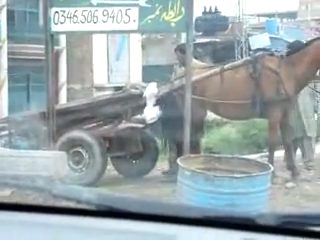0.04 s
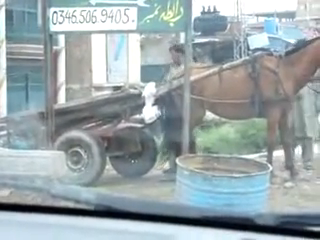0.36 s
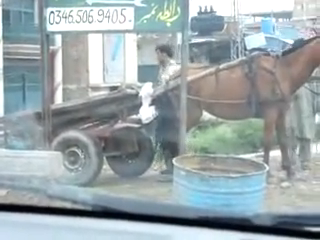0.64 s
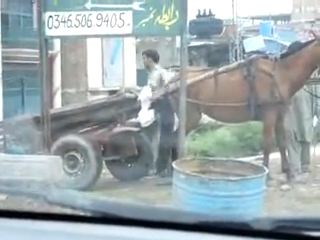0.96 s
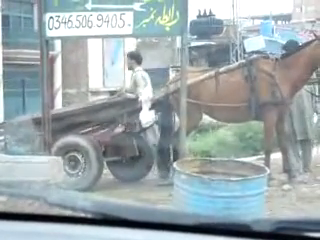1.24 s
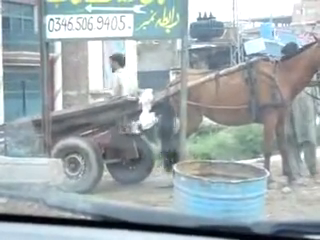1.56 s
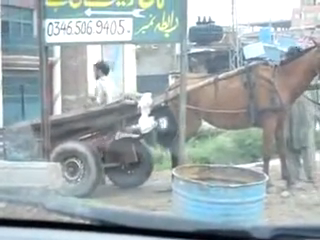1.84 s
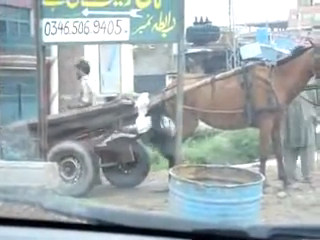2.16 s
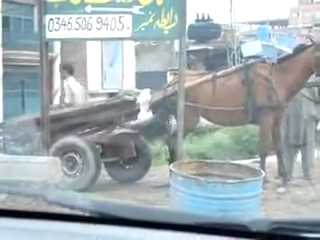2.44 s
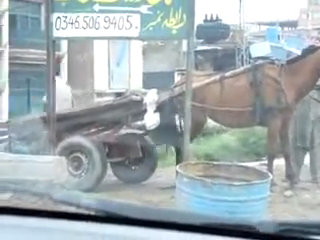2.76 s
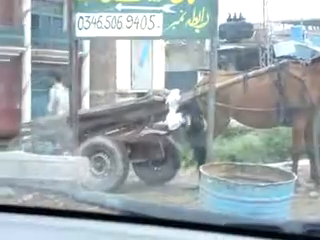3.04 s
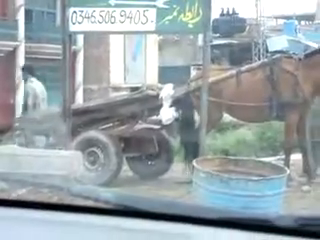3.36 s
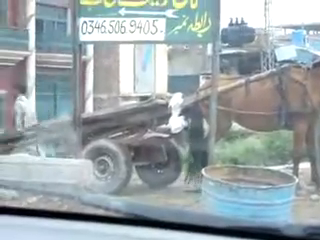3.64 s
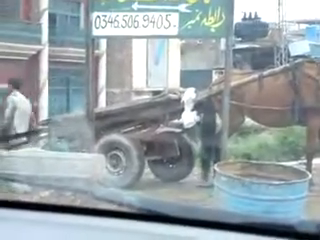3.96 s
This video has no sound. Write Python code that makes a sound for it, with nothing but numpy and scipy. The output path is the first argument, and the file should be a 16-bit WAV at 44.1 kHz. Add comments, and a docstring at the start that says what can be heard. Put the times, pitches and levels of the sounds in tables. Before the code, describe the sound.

A car engine idles with a deep, uneven throb, heard behind the windscreen with the windows shut. Tyres rumble and thud softly over three bumps, then ease off as a second low hum swells and a faint whine grows.

```python
"""Inside a small car creeping along a roadside, microphone behind the windscreen, windows shut.
From the start each firing of the idling engine presses on the cabin air as a deep, uneven throb, while
the tyres rumble through the body and thud over three bumps. Halfway the rumble eases off; then a second
hum swells and beats against the idle, and a faint whine grows. All along, the throb just overloads the
recorder, whose hiss flutters with every swing of it."""
import sys
import numpy as np
from scipy import signal
from scipy.fft import irfft
from scipy.io import wavfile
from scipy.ndimage import map_coordinates

SR = 44100
rng = np.random.default_rng(int(sys.argv[2]) if len(sys.argv) > 2 else 0)


def wav_out(sig):
    """Save sig, one row per channel (or a flat mono array), as 16-bit PCM at SR to the path in sys.argv[1]."""
    wavfile.write(sys.argv[1], SR, np.round(np.clip(np.atleast_2d(sig).T, -1, 1) * 32767).astype(np.int16))


N = 176400


def undb(db):
    """Decibels to gain."""
    return 10 ** (np.asarray(db) / 20)


def curve(rows):
    """Straight lines through (time_s, value) rows."""
    return np.interp(np.arange(N) / SR, *np.array(rows).T)


def walk(per_s):
    """A smooth random drift of spread 1, changing about per_s times a second."""
    steps = rng.standard_normal(2000)
    drift = map_coordinates(steps, [np.arange(N) / SR * per_s + 4], order=3, mode="wrap")
    return drift / drift.std()


def noise(gain):
    """Noise of rms 1 whose spectrum has the shape gain(hz)."""
    hz = np.maximum(np.arange(N // 2 + 1) * SR / N, 1)
    wave = irfft(gain(hz) * np.exp(2j * np.pi * rng.random(len(hz))), N)
    return wave / wave.std()


def coloured(points):
    """Noise of rms 1 shaped by (frequency_hz, relative_db) points, falling away below the first."""
    points_hz, db = np.array(points).T

    def gain(hz):
        low_cut = np.minimum(hz / points_hz[0], 1) ** 2
        return undb(np.interp(np.log(hz), np.log(points_hz), db)) * low_cut
    return noise(gain)


def wavering(hz, spread_hz, per_s):
    """A tone of rms 1 whose pitch wanders."""
    cycles = np.cumsum(hz + spread_hz * walk(per_s)) / SR
    return np.sqrt(2) * np.sin(2 * np.pi * (cycles + rng.random()))


def ringing(centre_hz, width_hz):
    """A steep resonance shaken at random, rms 1."""
    return noise(lambda hz: 1 / (1 + ((hz / centre_hz - centre_hz / hz) * centre_hz / width_hz) ** 2))


def engine():
    """Cabin pressure drops at each firing, strong and weak by turns; the block rocks once a crank turn."""
    # engine speed: time_s, firing_hz
    speed = [(0, 24.95), (1.6, 24.97), (2.0, 25.35), (2.5, 25.05), (3.1, 25.15), (4, 25.0)]
    # harmonics of the rounded sawtooth of pressure: multiple, level_db, scatter_db
    orders = [(1, -13, 0.5), (2, -25, 1.5), (3, -42.5, 2.5), (4, -52.5, 1), (5, -48.5, 0), (6, -46, 4)]
    first_firing_s, jitter_cycles, rock_db = 0.03337, 0.022, -33
    firing_hz = curve(speed)
    cycles = np.cumsum(firing_hz) / SR - first_firing_s * firing_hz[0] + jitter_cycles * walk(per_s=11)
    throb = 0
    for multiple, level_db, scatter_db in orders:
        amplitude = np.sqrt(2) * undb(level_db + scatter_db * walk(per_s=firing_hz[0]))
        throb -= amplitude * np.sin(2 * np.pi * round(multiple) * cycles)
    limp = 1 + 0.1 * np.sin(np.pi * cycles)  # alternate firings differ
    rocking = np.sqrt(2) * undb(rock_db) * np.cos(np.pi * cycles)
    return throb * limp - rocking


def cabin():
    """The body rocks and the air around the microphone booms under the uneven idle."""
    # cabin resonances: centre_hz, width_hz, level_db
    booms = [(13.2, 18, -29.5), (27, 19, -30), (49, 11, -31.5), (76, 16, -44.5), (110, 22, -40),
             (144, 9.4, -49)]
    return sum(undb(db) * ringing(hz, width_hz) for hz, width_hz, db in booms)


def tyres():
    """Rough ground rumbles up through the floor in jolts; the body drones and the running gear whirrs."""
    # tyre rumble through the body: frequency_hz, relative_db
    road_spectrum = [(45, -20), (70, 0.5), (92, -1.5), (112, -0.5), (138, -3), (165, -16.5), (205, -13),
                     (235, -15.5), (280, -11.5), (340, -16), (420, -20), (520, -23.5), (650, -32),
                     (1000, -34.5), (1400, -36), (2000, -40.5), (2600, -49.5), (5000, -54)]
    # tones of the rolling body: pitch_hz, over_rumble_db
    drone_tones = [(106, -10), (129, -7.5)]
    # resonances of the running gear: centre_hz, width_hz, over_rumble_db
    whirr_bands = [(1168, 63, -35), (1405, 100, -35.5), (2001, 77, -34.5)]
    # level of the rumble: time_s, level_db
    rolling = [(0, -24), (.17, -28.5), (.28, -31), (.42, -27), (.9, -27.5), (1.3, -26.5), (1.55, -30),
               (1.8, -32), (2.1, -38.5), (2.6, -42.5), (3.3, -42), (3.7, -38.5), (4, -40)]
    jolt_db = 0.57
    rumble = coloured(road_spectrum) * undb(jolt_db * walk(per_s=14))
    drone = sum(undb(db) * wavering(hz, spread_hz=4, per_s=14) for hz, db in drone_tones)
    whirr = sum(undb(db) * ringing(hz, width_hz) for hz, width_hz, db in whirr_bands)
    return (rumble + drone + whirr) * undb(curve(rolling))


def wash():
    """Engine bay and street outside, muffled by the glass."""
    # the wash as it reaches the cabin: frequency_hz, relative_db
    spectrum = [(60, -2), (130, -3.5), (175, 0), (220, -4), (280, -2), (350, -4.5), (470, -11.5),
                (570, -8.5), (640, -13.5), (800, -16), (1150, -22), (1600, -25.5), (2400, -29.5),
                (4800, -39.5), (6000, -38)]
    # its slow rise and fall: time_s, level_db
    levels = [(0, -40.5), (1.5, -44), (2.2, -40), (2.8, -40.5), (3.3, -40), (3.7, -38), (4, -39)]
    flicker_db = 1.03
    return coloured(spectrum) * undb(curve(levels) + flicker_db * walk(per_s=25))


def bumps():
    """Soft thuds as the wheels meet bumps: a few cycles of the body that swell and die."""
    # bumps under the wheels: peak_s, pitch_hz, level_db
    thuds = [(0.181, 122, -26), (1.25, 78, -28), (1.53, 115, -28)]
    swell_s = 0.039
    t = np.arange(N) / SR
    sound = 0
    for peak_s, hz, db in thuds:
        envelope = undb(db) * np.exp(-((t - peak_s) / swell_s) ** 2)
        sound += envelope * wavering(hz, spread_hz=2, per_s=20)
    return sound


def hum():
    """A second low hum, perhaps another engine close by, beats against the idle and makes it chug."""
    # drift of the hum: time_s, pitch_hz
    pitches = [(0, 56.87), (1.3, 57.62), (2.85, 55.6), (3.4, 57.79), (4, 58.6)]
    # its swells: time_s, level_db
    levels = [(0, -44), (1.2, -31), (1.7, -44), (2.2, -45), (2.35, -29.5), (2.7, -28.5), (3.0, -33),
              (3.4, -26), (3.7, -24), (4, -30)]
    return undb(curve(levels)) * wavering(curve(pitches), spread_hz=0.17, per_s=4)


def whine():
    """Thin wavering tones that grow towards the end."""
    # narrow bands of the whine: centre_hz, width_hz, relative_db
    bands = [(702, 14, -1), (804, 15, -7.5), (914.6, 19, -4), (1143, 25, -10), (1453, 50, -12.5),
             (4870, 60, -17)]
    # its growth: time_s, gain_db
    growth = [(0, -62), (1.8, -57.5), (2.9, -57), (3.5, -53.5), (4, -56)]
    return undb(curve(growth)) * sum(undb(db) * ringing(hz, width_hz) for hz, width_hz, db in bands)


def scene():
    """Everything as it reaches one microphone behind the windscreen."""
    return (engine() + hum() + cabin() + tyres() + bumps() + wash() + whine())[None]


def record(dry):
    """The recorder flattens the tallest swings; its hiss grows with the swing and sinks on the flat tops."""
    full_swing, knee_hardness = 0.44, 17
    rest_hiss_db, hiss_per_swing_db, flicker_db = -71, -38.5, 1.06
    hiss_edge_hz, top_hz = 5075, 6100
    overload = 1 + np.abs(dry / full_swing) ** knee_hardness
    limited = dry / overload ** (1 / knee_hardness)
    hiss = noise(lambda hz: 1 / np.sqrt(1 + (hz / hiss_edge_hz) ** 15))
    hiss *= undb(flicker_db * walk(per_s=18))  # uneven clusters
    hiss_gain = undb(rest_hiss_db) + undb(hiss_per_swing_db) * np.abs(limited) / overload
    lowpass = signal.butter(12, top_hz, fs=SR, output="sos")
    return signal.sosfiltfilt(lowpass, limited + hiss * hiss_gain)


dry = scene()
out = record(dry)
wav_out(out)
```